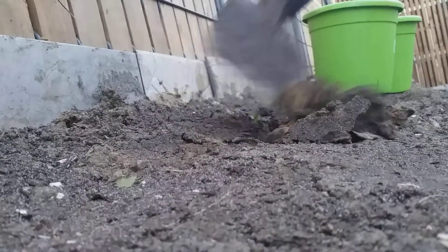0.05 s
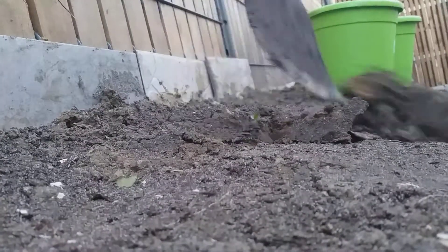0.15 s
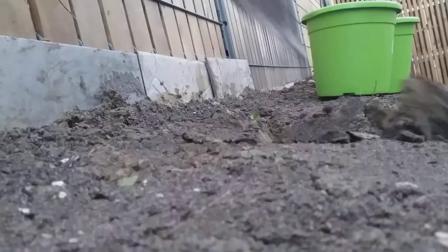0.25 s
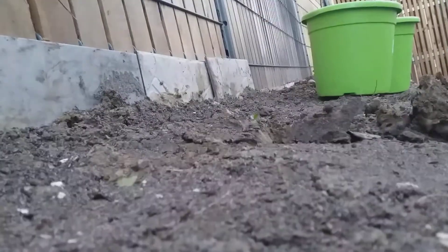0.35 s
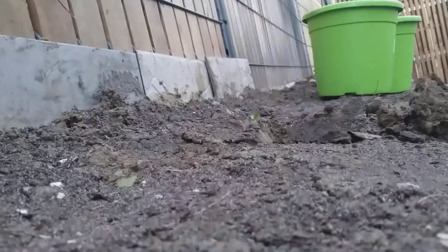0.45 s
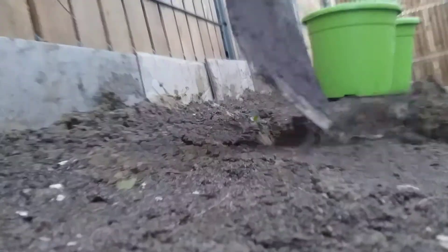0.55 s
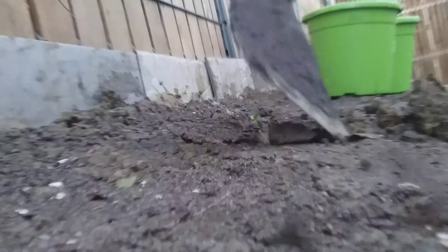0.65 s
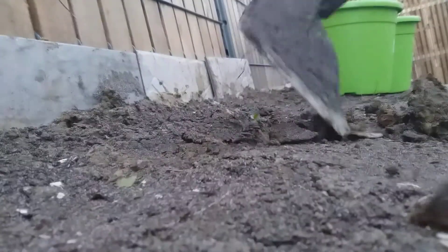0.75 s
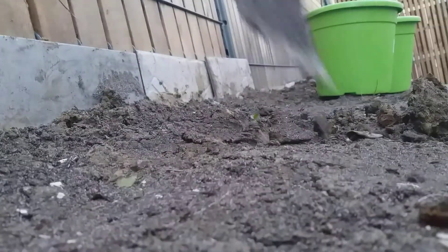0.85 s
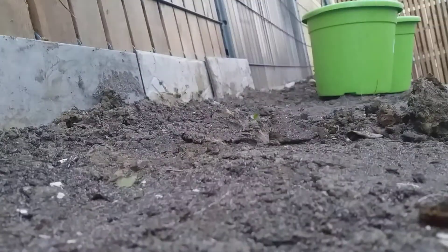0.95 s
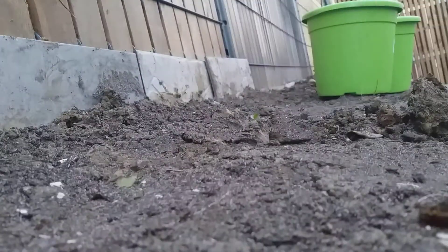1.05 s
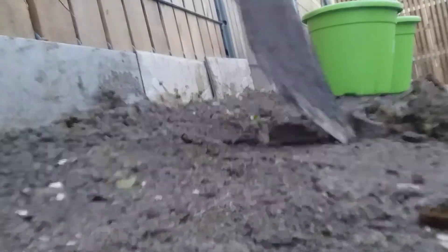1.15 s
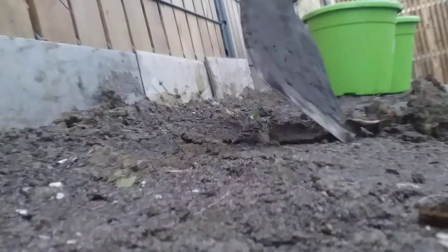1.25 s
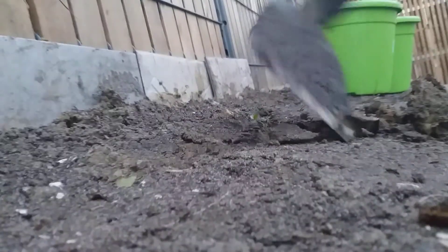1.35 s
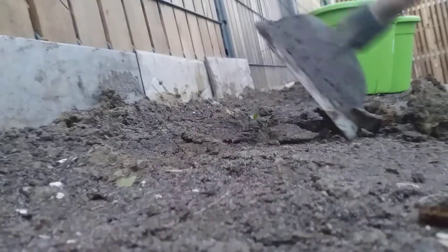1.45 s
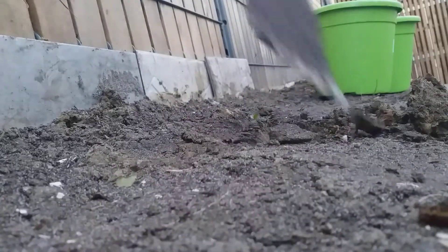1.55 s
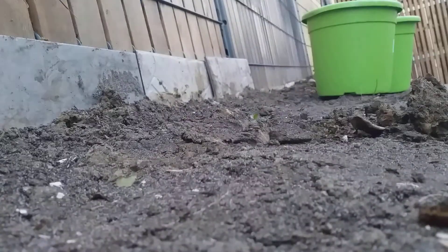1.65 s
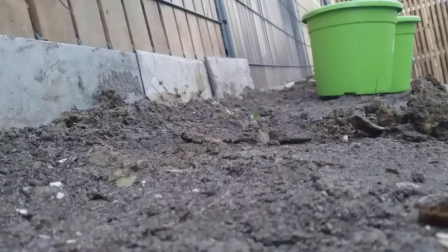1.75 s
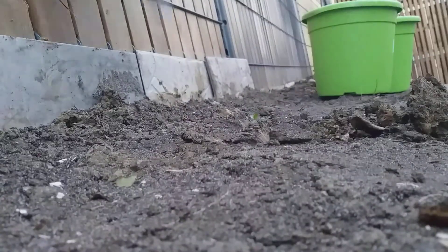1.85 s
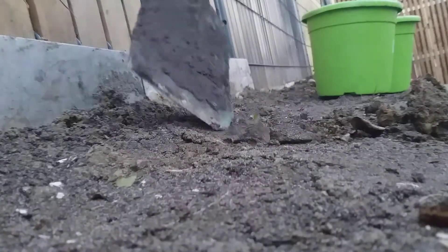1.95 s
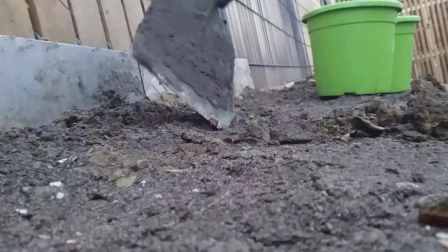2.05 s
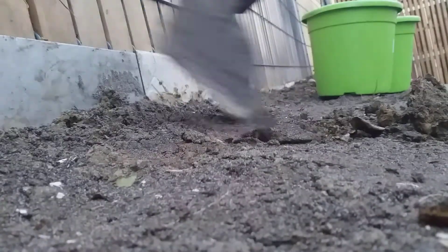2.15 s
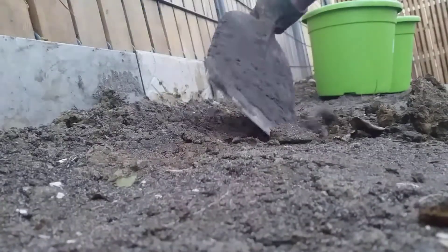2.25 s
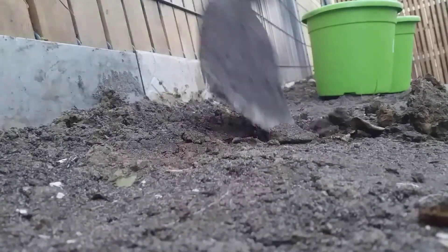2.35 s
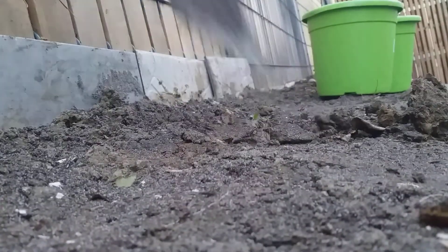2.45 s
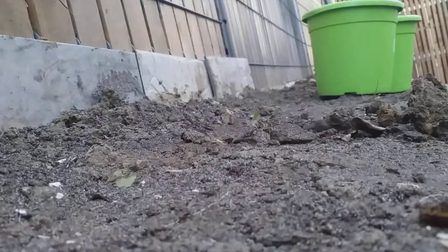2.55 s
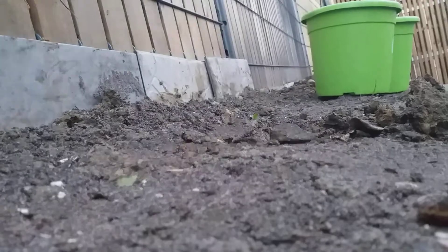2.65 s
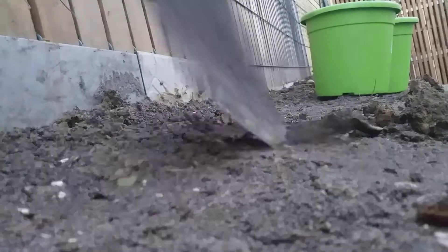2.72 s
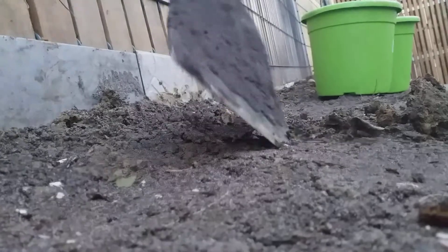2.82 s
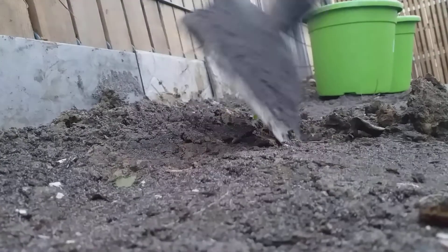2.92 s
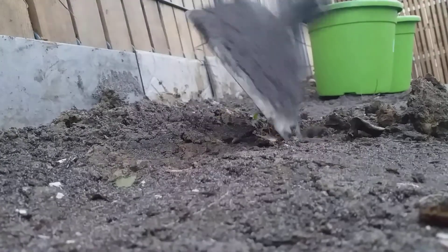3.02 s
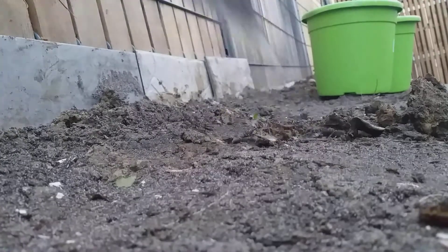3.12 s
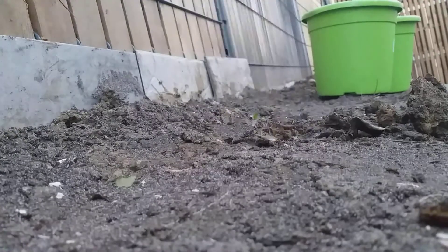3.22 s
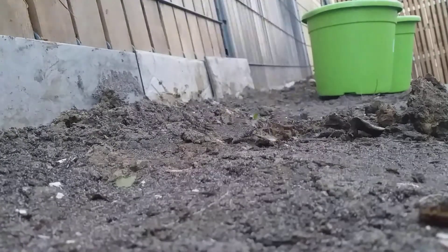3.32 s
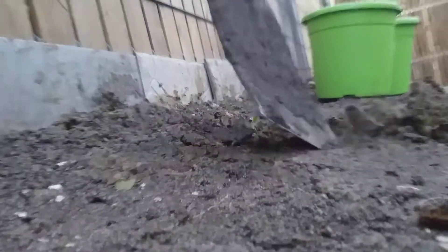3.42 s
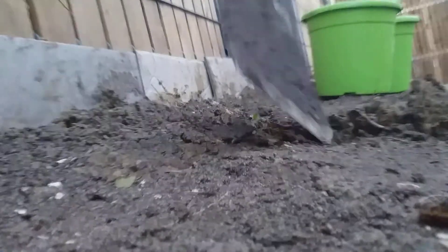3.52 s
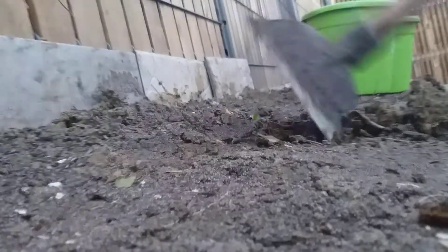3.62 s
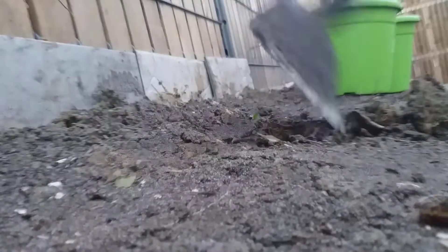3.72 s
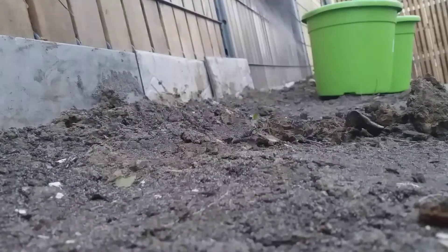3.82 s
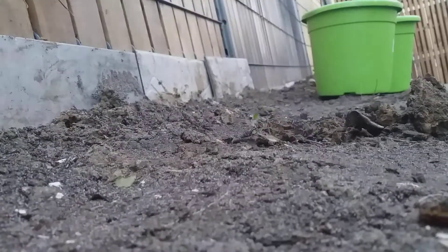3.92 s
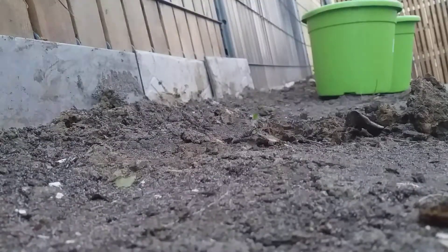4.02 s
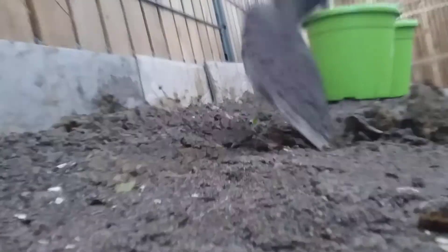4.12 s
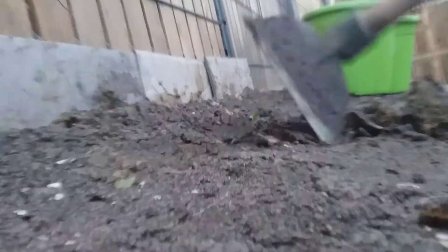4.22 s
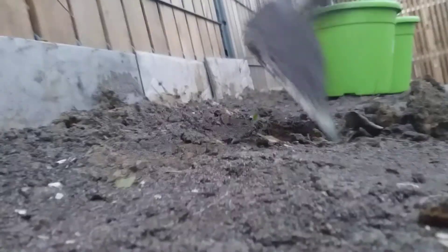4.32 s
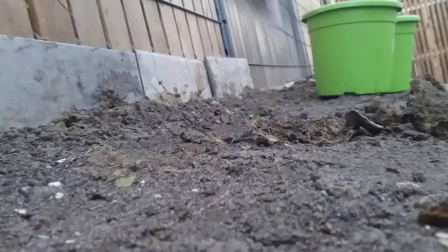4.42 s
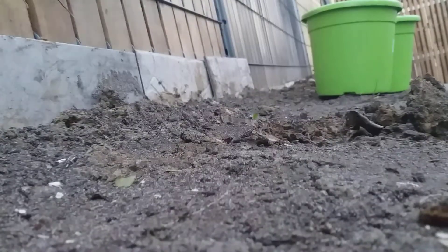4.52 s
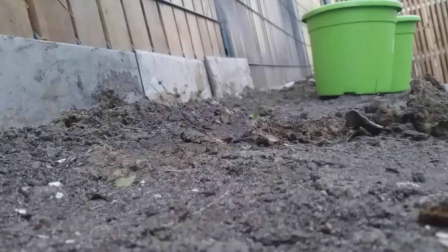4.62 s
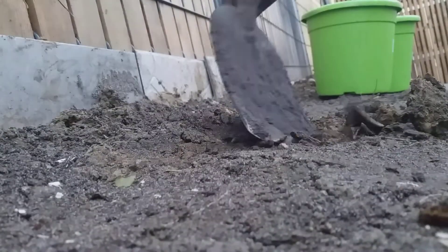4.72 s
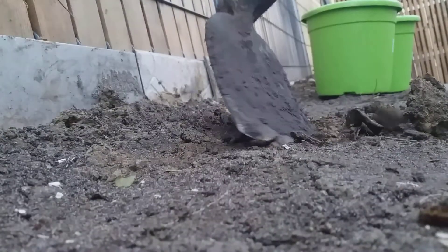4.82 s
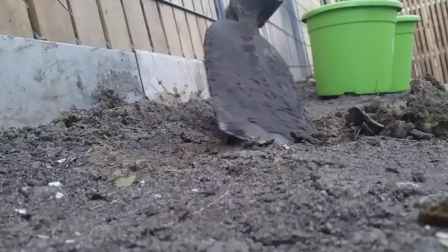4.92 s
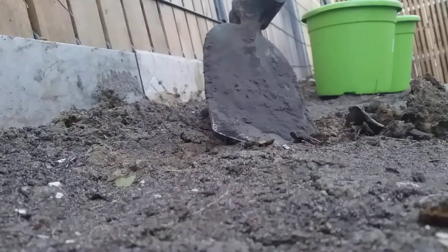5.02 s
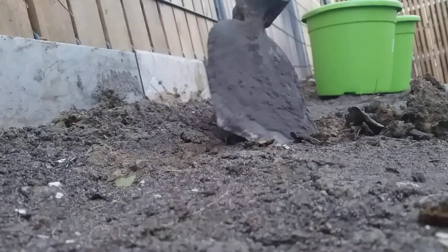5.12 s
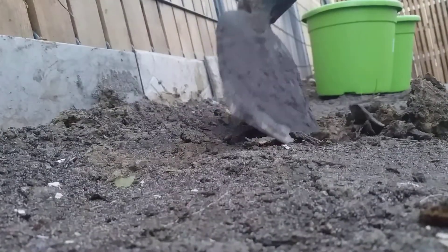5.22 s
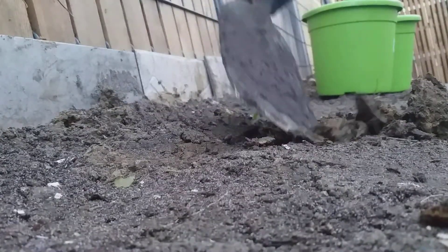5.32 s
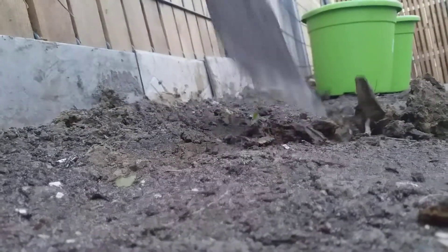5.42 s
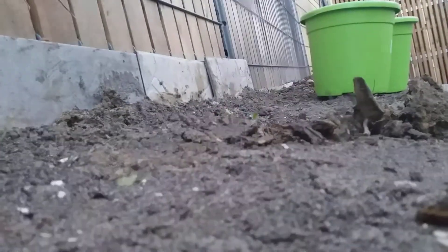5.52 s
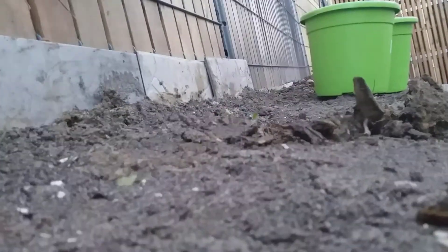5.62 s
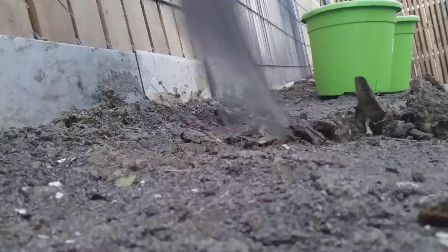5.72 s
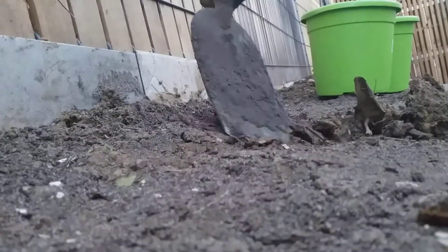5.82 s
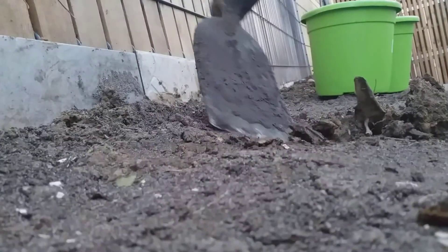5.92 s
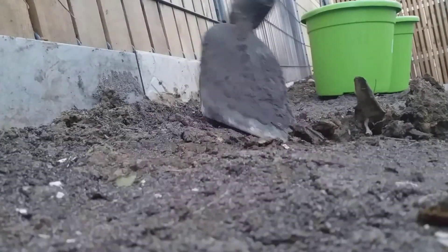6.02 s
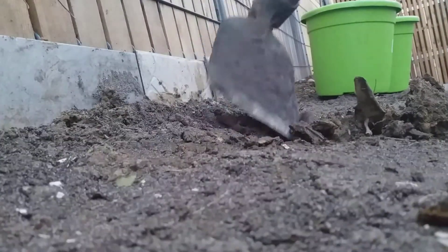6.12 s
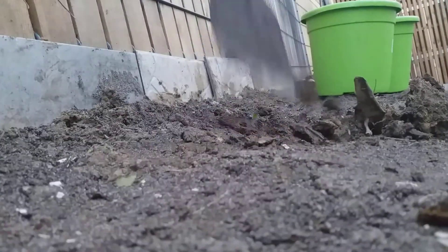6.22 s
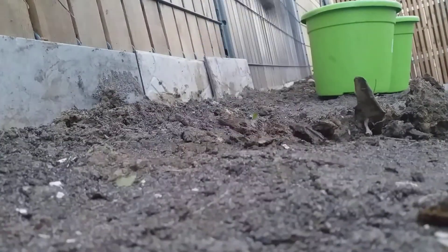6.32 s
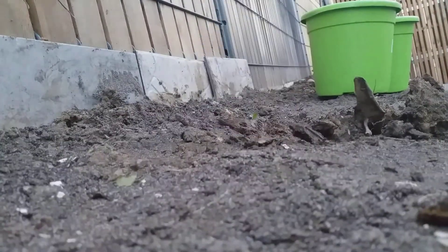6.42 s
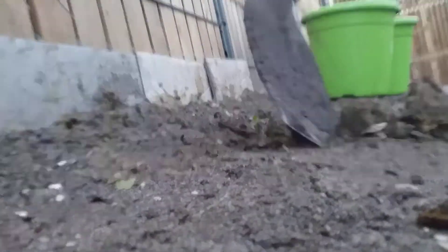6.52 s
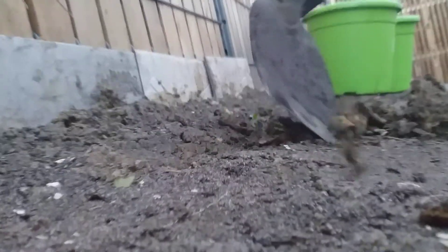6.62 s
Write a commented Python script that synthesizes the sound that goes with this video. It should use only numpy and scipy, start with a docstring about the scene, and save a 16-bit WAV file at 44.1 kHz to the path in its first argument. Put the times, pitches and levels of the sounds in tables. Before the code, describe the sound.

A steel hand hoe works packed garden soil, heard close by in a backyard with very little echo. It opens with a short scrape and a stone click. Nine sharp, gritty chops follow, at about 0.5, 1.2, 1.9, 2.7, 3.4, 4.1, 4.7, 5.7 and 6.5 seconds, each with a dull earthy thud; the heaviest is at 3.4. After each strike the blade drags briefly through crackling crumbs and scrapes free. Pebbles tick brightly against the steel, most clearly around 2.8, 3.5, 4.9, 5.4 and 6.2 seconds. The edge gives short metallic pings, clearest near 1.5 and 3.1 seconds. Small clods patter down softly between 0.6 and 1 second, along with three light hollow wooden knocks around 1 second. Sand and crumbs trickle faintly between strokes, and soft dull scuffs come near 4 seconds. Very faint distant traffic lies underneath, swelling slightly around 3 seconds and fading.

```python
"""Hoeing packed garden soil

A steel hand hoe chops the ground nine times, heard from close by. Each impact fractures grains in a
few gritty bites and sets the earth thudding. Friction drives the blade's modes as it drags through
crumbs, flicks pebbles and scrapes free. Clods and sand fall back, wood knocks lightly, the ground is
scuffed and the yard walls reflect faintly, while distant traffic swells and fades."""
import sys
import numpy as np
from scipy import signal
from scipy.fft import rfft, irfft
from scipy.io import wavfile
from scipy.ndimage import uniform_filter1d

SR = 44100
rng = np.random.default_rng(int(sys.argv[2]) if len(sys.argv) > 2 else 0)


def output_pcm(signal):
    """Save a mono or channel-first signal as 16-bit PCM at the path in sys.argv[1].

    Samples are clipped to [-1, 1] before scaling.
    """
    pcm = np.clip(np.atleast_2d(signal).T, -1, 1) * 32767
    wavfile.write(sys.argv[1], SR, np.round(pcm).astype(np.int16))


N = 293706
T = np.arange(N) / SR

# Event levels are relative within each source.
# pulls of the buried blade: start_s, end_s, start_db, end_db, tug_s, tug_db
BLADE_PULLS = [(0, 0.303, -60, -64.5, .098, -48), (0.56, 0.817, -43, -58, .788, -46),
               (1.186, 1.498, -39, -61, 1.43, -56), (1.925, 2.112, -58.5, -69.5, 1.95, -49),
               (2.109, 2.25, -49.5, -52, 2.228, -41), (2.249, 2.313, -57.5, -72, 2.275, -48),
               (2.753, 3.012, -47.5, -45.5, 2.885, -37.5), (3.456, 3.726, -30, -55.5, 3.62, -44),
               (4.107, 4.327, -42, -43, 4.245, -40.5), (4.71, 5.039, -48, -45, 4.842, -43),
               (5.064, 5.37, -63.5, -53, 5.332, -46), (5.766, 6.158, -45, -58.5, 5.895, -35),
               (6.545, 6.66, -38, -56, 6.615, -39.5)]
# the largest stones flicked: start_s, level_db, pitch_hz
LARGE_STONES = [(.068, -30, 3210), (.1012, -14.5, 5600), (1.943, -24, 3520), (2.118, -23, 3570),
                (2.2064, -14.5, 7000), (2.5276, -33.5, 3970), (2.7803, -20.5, 4440), (2.8174, -7.5, 6260),
                (2.871, -21.5, 6300), (3.4754, -14, 6000), (3.4929, -11, 6200), (3.5117, -6.5, 6300),
                (4.8822, -18, 5900), (4.9067, -8.5, 6170), (4.9117, -11, 4780), (5.0306, -22.5, 3780),
                (5.3115, -20, 5630), (5.3712, -11.5, 4500), (5.3834, -12, 6140), (5.3972, -21, 4400),
                (5.8072, -19.5, 5400), (5.9491, -21.5, 6800), (6.1674, -13, 5950), (6.1878, -12, 5180),
                (6.54, -17.5, 6510), (6.5998, -19, 5800)]
# light bumps of the blade on the ground: start_s, jar_db
BUMPS = [(.102, -39), (1.515, -41), (2.125, -48.5), (2.208, -37.5), (3.03, -43), (6.19, -40)]
# the bare blade scraping the surface: peak_s, rise_s, level_db, favoured_hz, lift_db
SCRAPE_STROKES = [(0.103, 0.0041, -34.5, 656, 16.5), (0.144, 0.0054, -46, 1530, 15.5),
                  (.775, .035, -55.5, 2405, 16.5), (1.43, 0.043, -61.5, 2405, 24),
                  (1.52, 0.0098, -43, 2405, 23), (2.134, .006, -42, 3530, 7),
                  (2.211, 0.0031, -29.5, 2580, 24), (2.354, 0.0099, -32, 3280, 18),
                  (3.021, 0.0052, -24, 6115, 4.5), (3.056, .013, -31.5, 2400, 7.5),
                  (3.703, .016, -48.5, 2420, 11), (4.272, 0.0029, -32, 3640, 5.5),
                  (4.321, .012, -45.5, 2405, 9), (5.381, .016, -32, 4400, 9), (6.171, 0.01, -29, 5950, 3.5)]
# the edge slipping off the ground: start_s, peak_db
EDGE_RELEASES = [(.150, -44), (1.527, -33), (3.072, -23), (3.715, -39.5), (4.332, -39)]
# loose crumbs settling after a stroke: peak_s, fall_s, level_db
TRICKLES = [(.26, 0.14, -75), (0.859, 0.16, -70), (2.44, 0.11, -69), (3.2, .12, -80), (4.38, 0.036, -69.5),
            (5.42, 0.035, -58.5), (6.22, 0.055, -67)]
# chops: start_s, entry_db, hold_s, body_db, cut_s, stop_db, stop_body_db, jar_db, thud_delay_s, thud_db
HOE_CHOPS = [(0.5373, -25, 0.0062, -1, 0.0096, -13.5, 11, -28, 0.025, -20),
             (1.1578, -10.5, .0012, -3.5, 0.0076, -8.5, 1.5, -26.5, 0.019, -21.5),
             (1.9109, -26, 0.0054, 0.5, 0.0096, -34, 14, -30.5, 0.025, -35),
             (2.736, -14, 0.0058, 1.5, 0.0078, -30.5, 9, -17, 0.02, -24),
             (3.4181, -7.5, 0.0025, 0, 0.022, -18.5, 14, -10, 0.013, -10.5),
             (4.0916, -9, 0.0018, 2, 0.0062, -33, 7, -25.5, 0.011, -24.5),
             (4.6731, -8.5, 0.0041, -10.5, .0092, -14, -1, -35.5, .0152, -32.5),
             (5.7473, -9.5, 0.0049, -15, .0075, -18.5, 0.5, -29.5, 0.019, -38.5),
             (6.511, -15.5, 0.0083, -3.5, 0.011, -14, 12.5, -26, 0.029, -27.5)]
# clods dropping back: start_s, level_db, pitch_hz
FALLING_CLODS = [(.625, -40, 913), (.695, -46, 880), (.708, -37, 821), (.709, -45, 2480), (.826, -48, 541),
                 (.882, -50.5, 2188), (.919, -50.5, 5000), (.971, -57, 2816), (1.012, -58.5, 3540)]
# sand sliding off the blade: peak_s, rise_s, fall_s, level_db
SAND_SLIDES = [(0.796, 0.027, 0.011, -46), (2.345, 0.0059, 0.01, -61), (3.05, 0.028, 0.035, -52.5),
               (4.251, 0.0089, 0.018, -63), (4.94, 0.024, 0.017, -52), (5.375, 0.013, 0.014, -44.5),
               (5.41, .01, .04, -70), (6.2, .01, .045, -65)]
# light knocks on hollow wood: start_s, peak_db
WOOD_KNOCKS = [(.868, -58.5), (0.95, -46), (1.114, -37)]
# dull scuffs on the ground: peak_s, rise_s, fall_s, level_db, grit_db
GROUND_SCUFFS = [(3.876, 0.01, 0.01, -50, -35.5), (3.922, 0.015, 0.01, -43, -7.5),
                 (3.963, 0.016, 0.023, -46, -10), (4.001, 0.011, 0.049, -53, -12),
                 (5.212, 0.01, 0.041, -58, -3.5), (5.546, 0.024, 0.048, -62, -11.5)]

# normal modes: pitch_hz, energy_db, t60_s (before any added damping)
BLADE_MODES = [(517, -17, .06), (765, -17, .06), (1190, -21, .04), (1550, -17, .06), (2395, -10, .06),
               (2960, -13, .04), (3210, -12, .085), (3640, -8, .04), (4176, -9, .04), (4410, -4, .05),
               (4530, -8, .05), (5010, -7, .05), (5150, -8, .04), (5490, -6, .045), (5800, -7, .05),
               (6115, 0, .07), (6480, -1, .045), (7000, -10, .035), (7400, -11, .045), (10700, -25, .03),
               (11400, -23, .03)]  # steel touching the soil
NECK_MODES = [(757, 0, .048), (480, -9, .035), (221, -8, .04), (1092, -19, .03)]  # blade and handle together
FREE_MODES = [(795, -13, .1), (1464, -12, .14), (2405, 0, .09), (3215, -12, .11), (6115, -8, .06)]  # steel clear of the soil
CLAMPED_MODES = [(1540, -12, .02), (2385, -8, .025), (2970, -11, .015), (3650, -8, .015), (4176, -5, .025),
                 (4500, -4, .02), (5006, -4, .03), (5510, -3, .02), (6140, -3, .02), (6480, 3, .03),
                 (7040, -6, .015), (7403, -10, .025)]  # steel gripped by the earth
WOOD_MODES = [(540, -5, 0.11), (744, -9, 0.052), (1190, -15, .04), (1950, -13, .06), (2300, -16, .03),
              (3570, -12, 0.013), (3810, -19.5, .014)]  # hollow wood

# spectral envelopes of the noise sources: frequency_hz, gain_db
TRAFFIC_SPECTRUM = [(25, -29), (70, -1), (160, -6.5), (300, -7), (500, -2.5), (800, -10), (1300, -16),
                    (2000, -29), (3500, -26), (6500, -23.5), (8500, -42), (15800, -32.5)]
CRUMB_SPECTRUM = [(40, -16), (100, -10), (250, -2), (600, -15.5), (1100, -2.5), (1900, -6), (2800, -2),
                  (4300, -0.5), (6500, -0.5), (7300, -6), (8200, -19.5), (10000, -21), (12000, -12),
                  (15800, -16.5)]
SCRAPE_SPECTRUM = [(60, -24), (200, -15.5), (600, -12.5), (1000, -19.5), (1900, -7), (3500, 6.5),
                   (6300, -1.5), (7400, -5), (8300, -22.5), (11000, -7.5), (15800, -11.5)]
BITE_SPECTRUM = [(60, -26), (200, -8), (500, -10), (1100, -11.5), (1900, -11), (2800, -8), (4300, -0.5),
                 (5500, 0), (6600, 4), (7300, -4.5), (8100, -20.5), (10000, -25.5), (12000, -19),
                 (15800, -22.5)]
SAND_SPECTRUM = [(1000, -48), (5000, -9.5), (8000, 3.5), (10000, -5.5), (13500, 5.5), (15800, 0)]
SCUFF_SPECTRUM = [(50, -25), (130, -6), (220, -1.5), (380, -3), (540, 5), (720, -13.5), (1400, -19),
                  (2200, -28.5), (8000, -57.5)]


def undb(db):
    """Amplitude grows tenfold for every 20 decibels."""
    return 10 ** (np.asarray(db) / 20)


def unit(x):
    """Dividing by the root of the energy gives a response of unit energy."""
    return x / np.sqrt(np.sum(x ** 2))


def through(x, response):
    """A linear system convolves its input with its impulse response."""
    return signal.fftconvolve(x, response)[:len(x)]


def add(track, start_s, sound):
    """Superposition: a sound adds to what the track already holds."""
    i = max(int(start_s * SR), 0)
    part = sound[:max(N - i, 0)]
    track[i:i + len(part)] += part


def colour(spectrum, size=2048):
    """Folding the cepstrum gives the minimum-phase response of a spectrum, here with unit energy."""
    hz, db = np.transpose(spectrum)
    bins_hz = np.fft.rfftfreq(size, 1 / SR)
    gain = undb(np.interp(np.log(bins_hz + 1), np.log(hz), db))
    cepstrum = irfft(np.log(gain))
    cepstrum[1:size // 2] *= 2
    cepstrum[size // 2 + 1:] = 0
    return unit(irfft(np.exp(rfft(cepstrum))))


def modes(table, damping_per_s=0):
    """Free vibration is a sum of decaying sinusoids; contact with soil adds damping."""
    t = T[:SR // 3]
    ring = 0
    for k, (hz, db, t60_s) in enumerate(table):
        decay = np.exp(-t * (np.log(1000) / t60_s + damping_per_s))
        ring += (-1) ** k * undb(db) * unit(np.sin(2 * np.pi * hz * t) * decay)
    return unit(ring)


def struck(blows, table):
    """An impulse excites all modes at once; each blow (start_s, peak_db) sets the peak of its ring."""
    force = np.zeros(N)
    for start_s, db in blows:
        add(force, start_s, undb([db]))
    ring = modes(table)
    return through(force, ring / np.abs(ring).max())


def band(x, hz, q):
    """A resonator passes its centre frequency at unit gain, more narrowly as q rises."""
    return signal.lfilter(*signal.iirpeak(min(hz, SR / 3), q, fs=SR), x)


def grit(rate_hz, spread_db):
    """Shot noise of unit rms: grains snap independently, with random size and sign."""
    size = undb(spread_db * np.minimum(rng.exponential(size=N), 4))
    snaps = (rng.random(N) < rate_hz / SR) * size * rng.choice([-1, 1], N)
    return snaps / snaps.std()


def crunch(hold_s, fall_s, rise_s=1 / 3000):
    """Many tiny fractures merge into a noise burst that builds, holds and decays."""
    t = T[:SR // 12]
    envelope = np.minimum(t / rise_s, 1) * np.exp(-np.maximum(t - hold_s, 0) / fall_s)
    return unit(envelope * rng.standard_normal(len(t))) * np.sqrt(np.sum(envelope ** 2))


def swell(peak_s, rise_s, fall_s):
    """A Gaussian envelope, with separate widths before and after its peak."""
    width_s = np.where(T < peak_s, rise_s, fall_s)
    return np.exp(-np.minimum(((T - peak_s) / width_s) ** 2 / 2, 20))


def traffic():
    """Distant vehicles sum to a dull, steady noise that swells once as one passes."""
    level = undb(-70.5) + undb(-59.5) * swell(peak_s=2.95, rise_s=0.38, fall_s=0.62)
    return level * through(rng.standard_normal(N), colour(TRAFFIC_SPECTRUM))


def steel(count=36):
    """A plate has many faint high modes above its main ones."""
    faint = [(7800 + 8000 * place, -24 - 12 * size, .05) for place, size in rng.random((count, 2))]
    return BLADE_MODES + faint


def blade(force, direct_db, ring_db, damping_per_s):
    """A contact radiates by two paths: directly from the grains and through the resonant steel."""
    direct = through(force, colour(CRUMB_SPECTRUM))
    ring = through(force, modes(steel(), damping_per_s))
    return undb(direct_db) * direct + undb(ring_db) * ring


def pulling(tug_width_s=0.015):
    """Soil resists the buried blade with a force that drifts through each pull, plus one brief tug."""
    effort = np.zeros(N)
    for start_s, end_s, start_db, end_db, tug_s, tug_db in BLADE_PULLS:
        steady = undb(np.interp(T, [start_s, end_s], [start_db, end_db]))
        tug = undb(tug_db) * swell(tug_s, tug_width_s, tug_width_s)
        effort += (steady + tug) * ((T >= start_s) & (T < end_s))
    return effort


def crackle(count, spread_db, q):
    """Brittle fracture: each crumb snaps at its own pitch, from 1.8 to 14 kHz; the sum has unit rms."""
    snaps = np.zeros(N)
    for when, pitch, size in rng.random((count, 3)):
        snap = rng.standard_normal(400) * np.exp(-T[:400] / .001)
        gain = undb(-spread_db * np.log(.04 + .96 * size))  # many weak, few strong
        add(snaps, when * T[-1], gain * (.3 * snap + band(snap, 1800 * 7.8 ** pitch, q)))
    return snaps / snaps.std()


def drag(slip_rate_hz=110, slip_spread_db=2.5):
    """Stick-slip friction: sand rubs the buried blade in fits and starts while larger crumbs snap."""
    effort = uniform_filter1d(pulling(), size=300)
    knots_s = np.arange(0, T[-1], 1 / slip_rate_hz)
    slips_db = slip_spread_db * np.interp(T, knots_s, rng.standard_normal(len(knots_s)))
    rubbing = undb(slips_db) * grit(rate_hz=2700, spread_db=1.0)
    crumbs = crackle(count=1200, spread_db=5, q=2.8)
    force = effort * (.62 * rubbing + .78 * crumbs)
    return blade(force, direct_db=-4.0, ring_db=-9.0, damping_per_s=9.5)


def pebbles(chances=60, above_pull_db=15, spread_db=0.5, centre_hz=5600):
    """Chance collisions with small stones scale with the pulling force: start_s, level_db, pitch_hz."""
    effort = pulling()
    for when, size, pitch in rng.random((chances, 3)):
        i = int(when * N)
        if effort[i] > 0:
            level_db = 20 * np.log10(effort[i]) + above_pull_db + spread_db * (2 * size - 1)
            yield T[i], level_db, centre_hz * 2 ** (pitch - .5)


def stones():
    """Brief, hard contacts are bright: each stone ticks at its own pitch on heavily damped steel."""
    force = np.zeros(N)
    for start_s, db, hz in [*LARGE_STONES, *pebbles()]:
        tick = crunch(hold_s=.0007, fall_s=.0018)
        add(force, start_s, undb(db) * (undb(-13) * tick + band(tick, hz, q=3.6)))
    return blade(force, direct_db=-7.5, ring_db=-14.5, damping_per_s=160)


def neck(entry_delay_s=.003, entry_offset_db=-5.5):
    """Sudden deceleration knocks the blade against its handle at each entry, stop and bump."""
    jars = []
    for start_s, _, _, _, cut_s, _, _, jar_db, *_ in HOE_CHOPS:
        jars.append((start_s + entry_delay_s, jar_db + entry_offset_db))
        jars.append((start_s + cut_s, jar_db))
    return struck(jars + BUMPS, NECK_MODES)


def scrapes(fall_per_rise=0.78):
    """Friction drives the bare blade; the point of contact decides which modes respond most."""
    rub, ring = np.zeros(N), np.zeros(N)
    grains = grit(rate_hz=6000, spread_db=-1)
    for peak_s, rise_s, db, favoured_hz, lift_db in SCRAPE_STROKES:
        force = undb(db) * swell(peak_s, rise_s, fall_per_rise * rise_s) * grains
        log_width = 0.041 + 150 / favoured_hz  # the low bending modes are excited together
        lifted = [(hz, energy_db + lift_db * np.exp(-(np.log(hz / favoured_hz) / log_width) ** 2), t60_s)
                  for hz, energy_db, t60_s in steel()]
        rub += force
        ring += through(force, modes(lifted))
    return undb(-4.5) * through(rub, colour(SCRAPE_SPECTRUM)) + undb(3.0) * ring


def ground(light_hz=113, sag_hz=99, half_length_s=.008):
    """Earth is heavily damped: a blow gives a short heave, lower if heavier, and then a shudder."""
    chop_thuds = [(start_s + delay_s, db) for start_s, *_, delay_s, db in HOE_CHOPS]
    bump_thuds = [(start_s + 0.017, jar_db - 10.5) for start_s, jar_db in BUMPS]
    heave, shudder = np.zeros(N), np.zeros(N)
    t = T[:SR // 8] - T[SR // 16]
    envelope = np.exp(-(t / half_length_s) ** 2)
    for peak_s, db in chop_thuds + bump_thuds:
        gain = undb(db)
        pitch_hz = light_hz - sag_hz * gain
        add(heave, peak_s + t[0], -gain * np.cos(2 * np.pi * pitch_hz * t) * envelope)
        add(shudder, peak_s, gain * crunch(hold_s=.004, fall_s=0.013, rise_s=0.0048))
    earth = colour([(25, -16.5), (75, -2.0), (130, -5.5), (250, -11.5), (600, -15.5), (2000, -43.0)])
    return heave + undb(-12.0) * through(shudder, earth)


def pings():
    """Sudden release leaves the blade in free vibration as its edge slips off the ground."""
    return struck(EDGE_RELEASES, FREE_MODES)


def settling():
    """Crumbs trickling back into the cut make sparse shot noise."""
    flow = sum(undb(db) * swell(peak_s, 0.024, fall_s) for peak_s, fall_s, db in TRICKLES)
    return through(flow * grit(rate_hz=260, spread_db=3.5), colour(CRUMB_SPECTRUM))


def bites(lead_in_s=0.003, stop_hold_s=0.0013):
    """Soil yields in jerks as the edge enters, grinds on and stops: start_s, level_db, hold_s, body_db."""
    for start_s, entry_db, hold_s, body_db, cut_s, stop_db, stop_body_db, *_ in HOE_CHOPS:
        yield start_s - lead_in_s, entry_db - 23.5, lead_in_s, body_db  # a faint lead-in of noise
        yield start_s, entry_db, hold_s, body_db  # enters
        yield start_s + hold_s, entry_db - 18, cut_s - hold_s, body_db + 4.5  # grinds on
        yield start_s + cut_s, stop_db, stop_hold_s, stop_body_db  # stops in firm earth


def chops(body_hz=1900):
    """Each bite fractures soil and excites the clamped blade; firmer earth gives more low-end body."""
    force = np.zeros(N)
    for start_s, db, hold_s, body_db in bites():
        burst = crunch(hold_s, fall_s=0.0033)
        burst[SR // 2000] += 5  # the opening crack
        body = signal.lfilter(*signal.butter(1, body_hz, fs=SR), burst)
        add(force, start_s, undb(db) * (burst + (undb(body_db) - 1) * body))
    direct = through(force, colour(BITE_SPECTRUM))
    ring = through(force, modes(CLAMPED_MODES))
    return undb(0.5) * direct + undb(-10) * ring


def clods():
    """Inelastic impact: clods land with dull pats and do not ring."""
    pats = np.zeros(N)
    for start_s, db, hz in FALLING_CLODS:
        impact = crunch(hold_s=0.00059, fall_s=0.0011)
        pat = band(band(impact, hz, q=0.5), hz, q=0.5)
        add(pats, start_s, 2 * undb(db) * pat / np.abs(pat).max())
    return pats


def sand():
    """Dense, tiny impacts merge into a hiss as sand slides off the lifted steel."""
    flow = sum(undb(db) * swell(peak_s, rise_s, fall_s) for peak_s, rise_s, fall_s, db in SAND_SLIDES)
    return through(flow * grit(rate_hz=4700, spread_db=6.5), colour(SAND_SPECTRUM))


def knocks():
    """Light impacts excite the quickly damped modes of hollow wood."""
    return struck(WOOD_KNOCKS, WOOD_MODES)


def scuffs():
    """Soft friction on the ground makes low noise, to which sand adds a little treble."""
    rub_level, sand_level = np.zeros(N), np.zeros(N)
    for peak_s, rise_s, fall_s, db, grit_db in GROUND_SCUFFS:
        push = undb(db) * swell(peak_s, rise_s, fall_s)
        rub_level += push
        sand_level += undb(grit_db) * push
    rub = through(rub_level * grit(rate_hz=1100, spread_db=2.5), colour(SCUFF_SPECTRUM))
    grains = through(sand_level * grit(rate_hz=6600, spread_db=3.5), colour(CRUMB_SPECTRUM))
    return rub + grains


def yard(x, t60_s, wet_db, delay_s):
    """Reflections from fence and walls form a delayed, duller tail that decays exponentially."""
    t = T[:SR]
    onset = np.clip(t / delay_s - 1, 0, 1)
    tail = rng.standard_normal(SR) * np.exp(-np.log(1000) * t / t60_s) * onset
    walls = colour([(60, -1), (500, 8.0), (2000, -2), (6500, -6), (9000, -8.5), (15000, -20.5)])
    return undb(wet_db) * through(x, unit(through(tail, walls)))


def scene():
    """Near sources, their reflections and the distant traffic superpose in one channel."""
    hoe = chops() + neck() + drag() + stones() + scrapes() + pings()
    near = hoe + ground() + sand() + settling() + clods() + scuffs() + knocks()
    return (near + yard(near, t60_s=.46, wet_db=-32, delay_s=.014) + traffic())[None]


def record(dry, bottom_hz=24, top_hz=16000):
    """Band limiting removes the deepest bass and highest treble; soft saturation rounds the peaks."""
    thin = signal.sosfiltfilt(signal.butter(1, bottom_hz, "high", fs=SR, output="sos"), dry)
    rounded = thin / (1 + thin ** 4) ** (1 / 4)
    return signal.sosfilt(signal.ellip(8, .2, 70, top_hz, fs=SR, output="sos"), rounded)


dry = scene()
out = record(dry)
output_pcm(out)
```